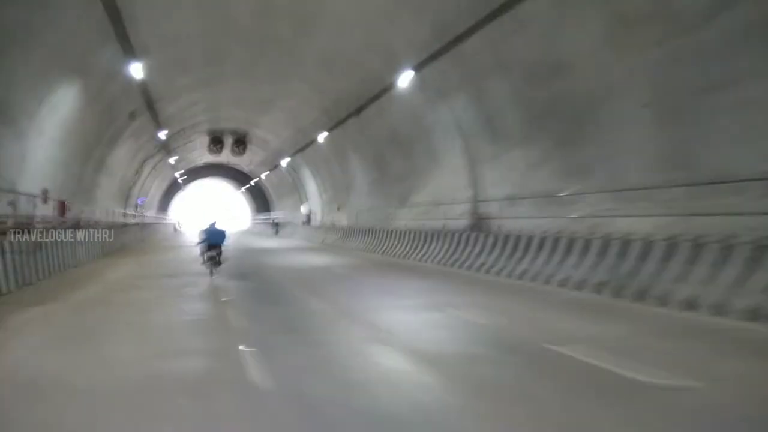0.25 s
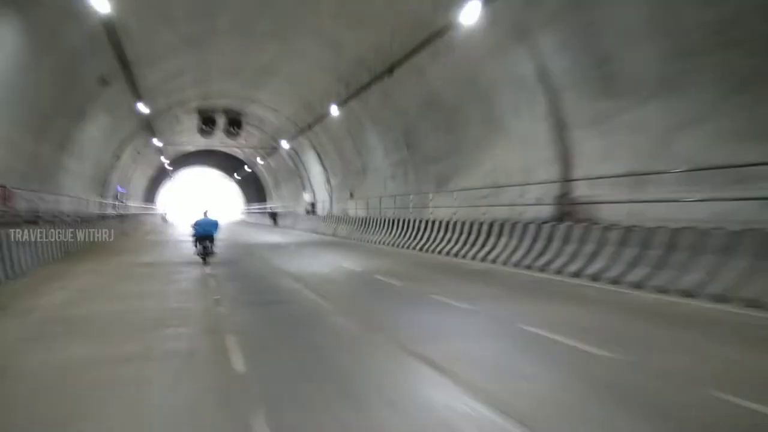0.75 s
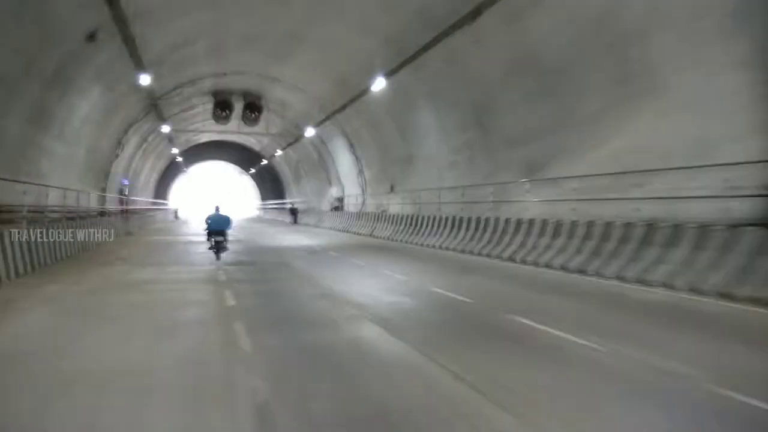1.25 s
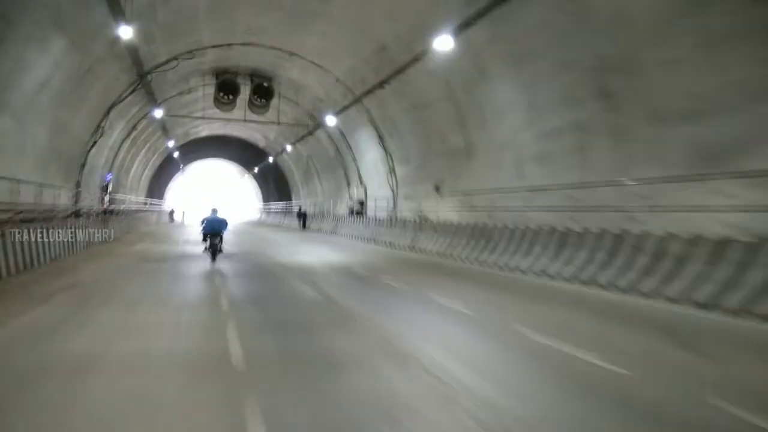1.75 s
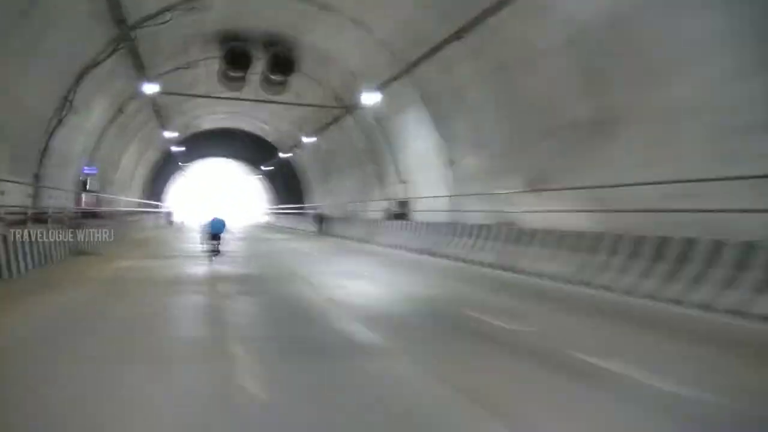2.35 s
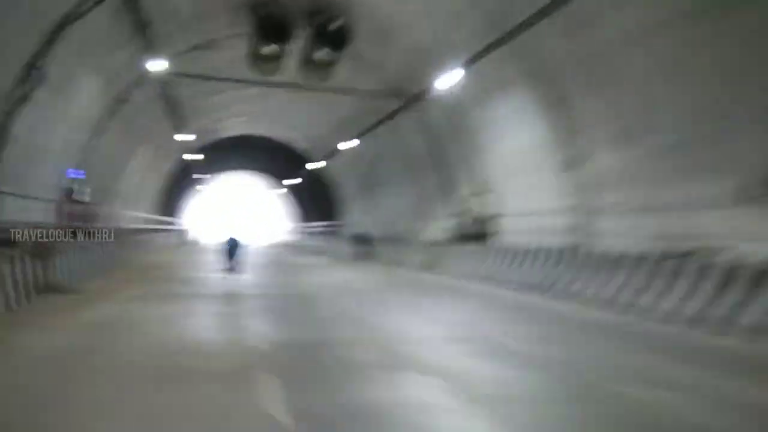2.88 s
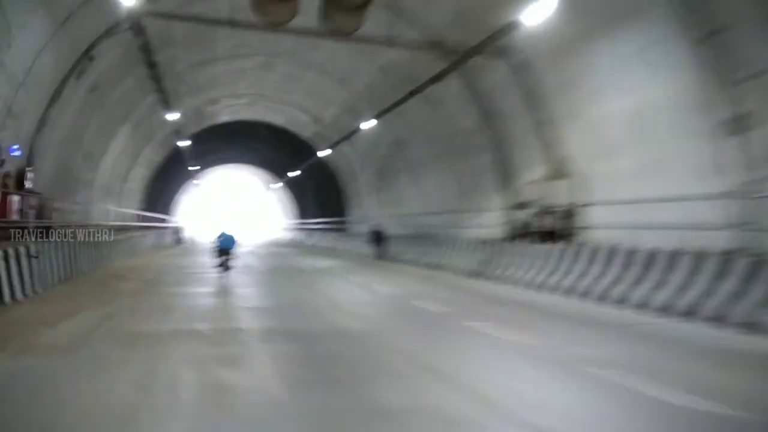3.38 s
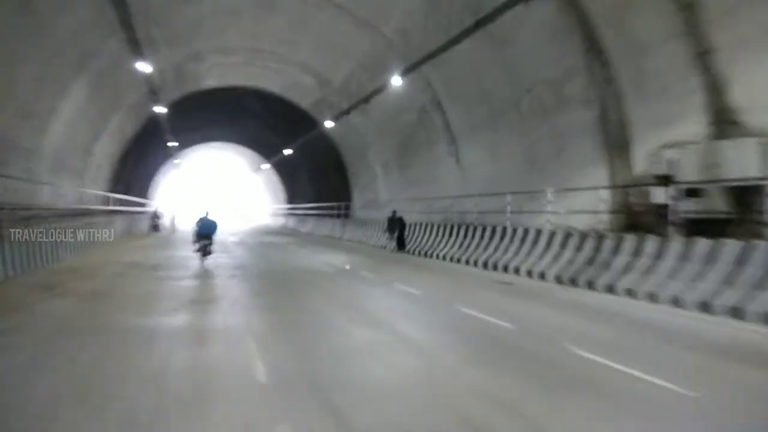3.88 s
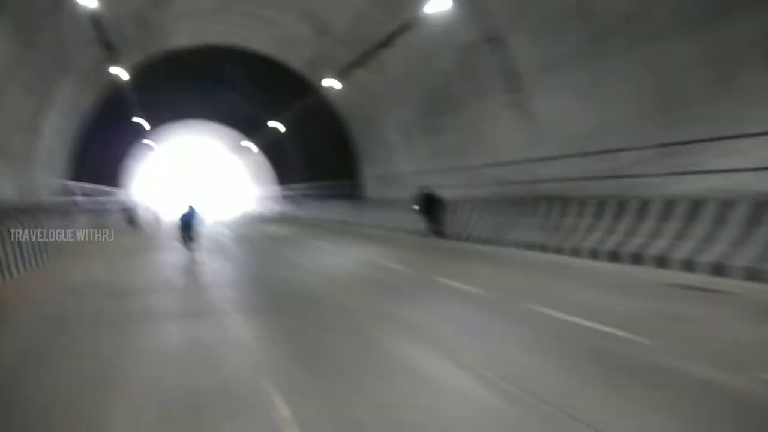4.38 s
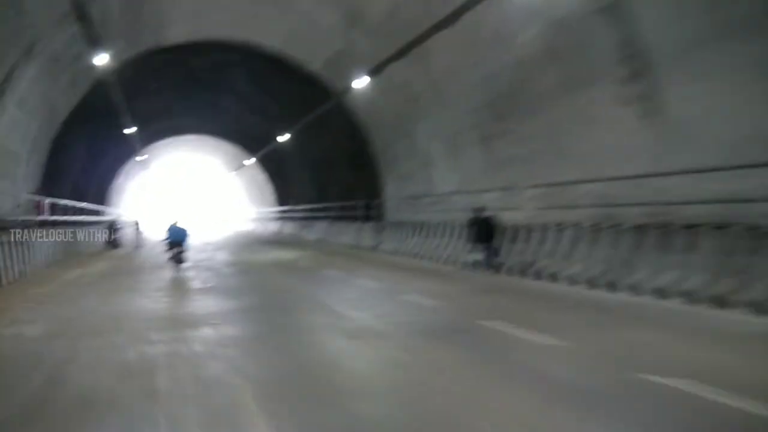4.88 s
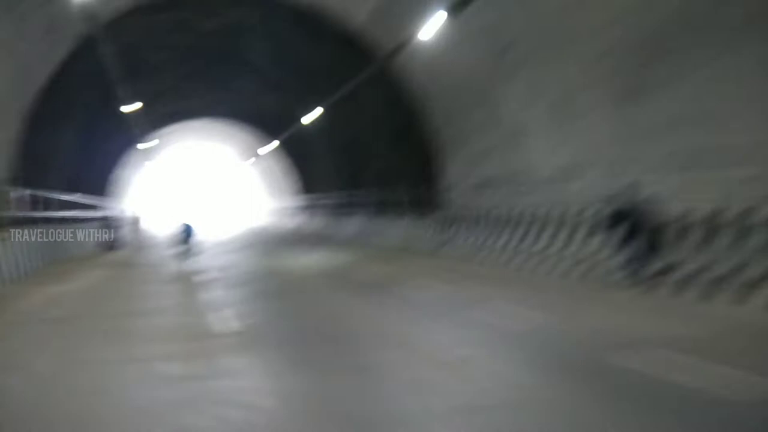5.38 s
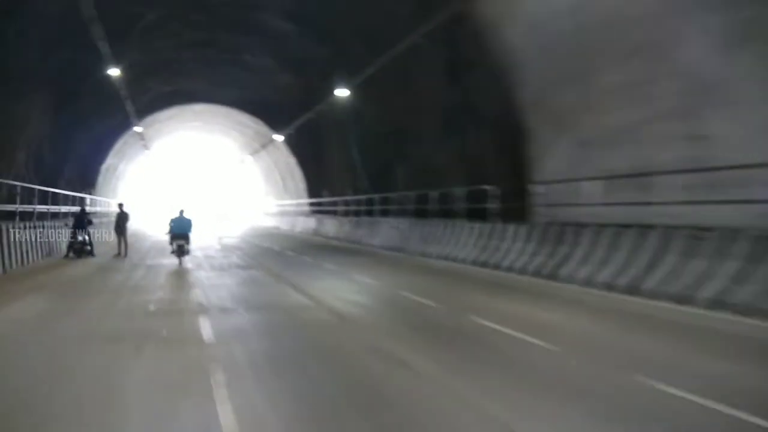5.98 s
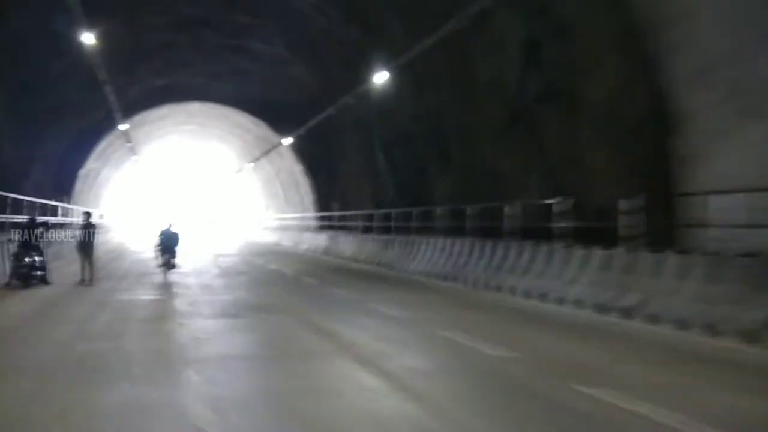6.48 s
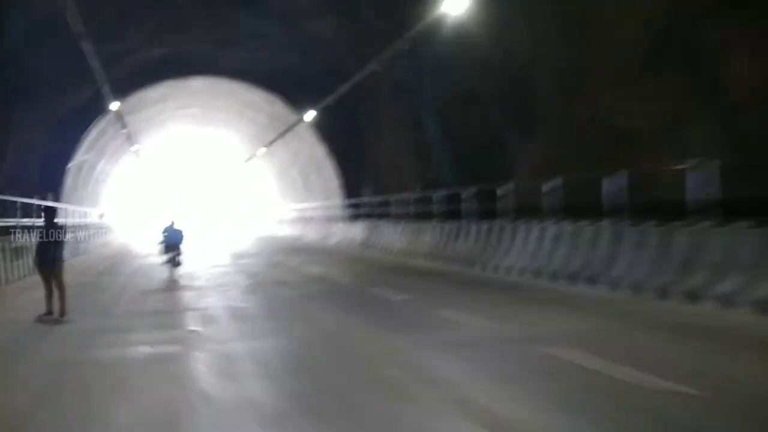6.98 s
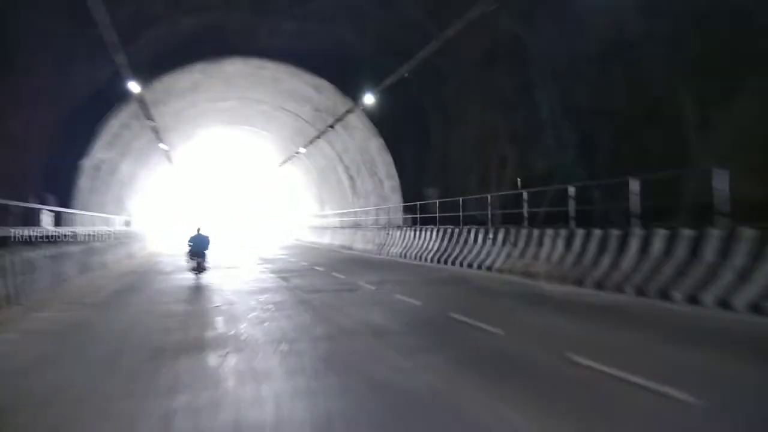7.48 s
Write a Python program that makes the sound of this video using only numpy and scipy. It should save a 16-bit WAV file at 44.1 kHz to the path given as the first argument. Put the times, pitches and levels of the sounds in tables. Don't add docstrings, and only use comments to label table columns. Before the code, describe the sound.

Motorbike ride through a road tunnel: heavy wind buffeting and snapping hard on the left, intermittent gusts on the right, faint engine drone and tyre hiss.

```python
import sys
import numpy as np
from scipy import signal
from scipy.fft import rfft, irfft
from scipy.io import wavfile
from scipy.ndimage import uniform_filter1d, minimum_filter1d, map_coordinates

SR = 44100
rng = np.random.default_rng(int(sys.argv[2]) if len(sys.argv) > 2 else 0)


def convert_level_to_amplitude(level_db):
    exponent = np.asarray(level_db, float) / 20
    return 10 ** exponent


def to_wav(s):
    ch = np.atleast_2d(s).T
    pcm = np.round(np.clip(ch, -1, 1) * 32767)
    wavfile.write(sys.argv[1], SR, pcm.astype(np.int16))


N = 341334

# frequency in Hz, density in dB per Hz.
TUNNEL_COLOUR = [(30, -7), (130, -9), (300, 3), (620, -20), (800, -34.5), (1400, -36.5), (2100, -18),
                 (2600, -16), (3200, -6)]
# time in seconds, cycles turned so far.
ENGINE_CYCLES = [(0, 0), (2.802, 40), (4.524, 65), (4.746, 68), (5.377, 77), (5.736, 82), (6.296, 90),
                 (7.783, 111)]
# time in seconds, level over the high hiss in dB.
TICK_LEVEL = [
    (0, -33),
    (2.6, -30),
    (3.6, -6),
    (4.5, -11),
    (5.4, -7),
    (6.0, -14),
    (7.74, -8.5),
]
# frequency in Hz, density in dB per Hz.
VALVE_COLOUR = [(6300, -24), (7100, -7.5), (7700, -1.5), (8500, -4.5), (9300, -13.5)]
# start in seconds, level in dB, decay in seconds.
WALL_PUFFS = [
    (1.064, -35.5, 0.13),
    (1.824, -34.5, 0.12),
]
# frequency in Hz, density in dB per Hz.
PUFF_COLOUR = [(3600, -26), (4200, 1.5), (6000, -2), (8300, -3.5), (9500, -13), (12000, -31)]
# frequency in Hz, density in dB per Hz.
LOW_HISS_COLOUR = [(1800, -22), (2500, -4), (3000, -3), (3180, -24), (3400, 2), (3830, -24), (4100, -0.5),
                   (4600, 3.5), (5500, -2), (6100, -5), (6900, -10.5), (8500, -75.5)]
RIGHT_HISS_COLOUR = [(6000, -15.5), (7400, 4), (9200, -2), (10200, 1), (11500, -4.5), (14000, -6.5),
                     (15700, -10)]
LEFT_HISS_COLOUR = [(5800, -8), (7800, -3), (9000, -6), (10200, 5.5), (11200, -3.5), (12100, 3),
                    (13200, -3), (14050, 4), (15000, -3), (15700, 0)]
# centre in seconds, half length in seconds, rise on the right in dB, on the left in dB.
HISS_SWELLS = [(0.6, 0.093, 6.5, 11.5), (0.8, 0.1, 4.5, 7.5), (1.16, 0.27, 11, 10.5),
               (1.56, 0.19, 8.5, 12.5), (1.9, 0.15, 10.5, 11), (2.2, 0.25, 6, 9), (2.44, 0.06, 3.5, 7.5),
               (2.86, 0.34, 8.5, 12.5), (3.38, 0.099, 8, 10), (3.52, 0.059, 6.5, 6), (3.76, 0.12, 9, 10),
               (3.9, 0.066, 6, 8.5), (3.98, 0.063, 5.5, 6.5), (4.07, 0.076, 11.5, 16.5),
               (4.24, 0.11, 8, 9.5), (4.44, 0.055, 4, 12), (4.58, 0.098, 7, 10), (4.96, 0.53, 3, 7),
               (5.11, 0.032, 2, 7.5), (5.48, 0.16, 5.5, 6.5), (5.74, 0.031, 0, 7.5), (5.96, 0.14, 5.5, 1.5),
               (6.36, 0.093, 6.5, 8), (6.56, 0.059, 9, 13.5), (6.74, 0.093, 12, 18), (7.0, 0.17, 8, 10.5),
               (7.44, 0.18, 7.5, 10.5), (7.72, 0.037, 4, 4.5)]
# time in seconds, low over high hiss in dB.
WALL_RETURN = [(0, 11), (1.3, 5.5), (2.3, -1.5), (3.998, -2), (5.5, -7), (6.15, 2.5), (6.4, -2), (7.74, -3)]
# centre in seconds, half length in seconds, rise of rumble in dB, of snaps in dB.
LEE_GUSTS = [(0.2, 0.21, 24, 14), (0.64, 0.027, 20, 11), (0.88, 0.052, 24, 12), (1.06, 0.063, 8, 12),
             (1.23, 0.1, 24, 19), (1.4, 0.15, 11.5, 2), (1.76, 0.11, 24.5, 9), (1.98, 0.18, 19, 10),
             (2.4, 0.32, 27.5, 23), (2.78, 0.088, 24.5, 19.5), (2.92, 0.061, 14, 15),
             (3.04, 0.1, 26.5, 14.5), (3.34, 0.33, 10, 7), (3.96, 0.33, 3, 8), (4.22, 0.086, 21, 17.5),
             (4.44, 0.064, 31, 19.5), (4.68, 0.17, 20.5, 5), (5.0, 0.15, 24, 15), (5.2, 0.09, -5, 7),
             (5.62, 0.043, 17, -5), (6.0, 0.044, 20, 5), (6.3, 0.049, 20.5, 12), (6.52, 0.1, 22, 14),
             (6.68, 0.09, 6, -3), (6.82, 0.087, 25.5, 20), (7.0, 0.15, 21.5, 3), (7.36, 0.055, 21, 5),
             (7.46, 0.063, 27, 28), (7.72, 0.081, 2, 15.5)]
# frequency in Hz, density in dB per Hz.
GUST_COLOUR = [(25, -12), (65, -23.5), (130, 3), (190, 2.5), (300, -1), (450, -12.5), (600, -23),
               (900, -45.5), (1500, -46)]
LEE_CAVITY_COLOUR = [(150, -39), (330, -4.5), (550, 4.5), (900, -11.5), (1200, -15.5), (1600, -11.5),
                     (2200, -21), (3200, -33.5)]
# start in seconds, level in dB, ring in Hz.
MOUNT_KNOCKS = [(2.317, -24, 840), (2.394, -36, 800), (2.425, -23, 750), (2.469, -21.5, 720),
                (2.5, -21, 710), (2.519, -31, 595), (2.769, -23, 880), (3.037, -28, 688), (3.086, -21, 710),
                (5.199, -17.5, 783), (7.42, -21, 685), (7.446, -23, 930), (7.461, -29, 936)]
# time in seconds, peak of the dull part in dB, bright part over
# the dull part in dB.
AIR_FLAPS = [(0.117, -36, -7), (0.246, -17, -2), (0.475, -37, 2), (0.641, -42, -8), (0.854, -38, -13),
             (1.055, -28, -22), (1.213, -25, -5), (1.38, -42, -12), (1.455, -38, -11), (1.605, -33, -3),
             (1.736, -24, -28.5), (1.787, -29, -5), (1.961, -33, 0), (2.023, -22, -20), (2.107, -25, 6),
             (2.188, -26, -21), (2.278, -11, -22), (2.623, -32, -6), (2.897, -25, 2), (3.198, -31, -0.5),
             (3.278, -41, -2), (3.36, -34, -16), (3.494, -34, 0), (3.56, -41, 0), (3.688, -40, 2),
             (3.869, -28, -6), (4.078, -37, -7), (4.132, -26, -4), (4.213, -20, -10), (4.441, -24, -9),
             (4.598, -44, -1), (4.762, -36, -2), (4.904, -33, -8), (4.95, -39, -14), (4.998, -22, -31),
             (5.045, -19, -5.5), (5.452, -45, -7), (5.637, -40, -1), (6.017, -45, -5), (6.268, -38, -11),
             (6.365, -45, 1), (6.484, -28, -25), (6.604, -41, -8), (6.815, -28, -15), (6.923, -32, -2),
             (7.009, -43, -3), (7.696, -33, -22)]
# frequency in Hz, density in dB per Hz.
FLAP_COLOUR = [(300, -6), (700, 0), (1000, -12), (1250, -40)]
FLAP_TOP_COLOUR = [(1100, -30), (1400, 0), (1800, -2), (2300, -25)]
# time in seconds, peak in dB.
STRAP_CRACKS = [(0.085, -19), (0.301, -20.5), (0.348, -13), (0.367, -14), (0.5524, -32), (0.764, -23.5),
                (0.976, -13), (1.3134, -49), (1.5799, -19.5), (1.661, -29), (3.1715, -26), (3.367, -23),
                (4.299, -23), (4.677, -33), (4.6927, -19), (4.7383, -19.5), (4.9452, -20), (5.1, -15.5),
                (5.1183, -23), (5.1324, -9.5), (5.423, -21.5), (5.7389, -29), (6.0167, -32), (7.135, -20),
                (7.1975, -41), (7.211, -19), (7.2906, -20), (7.585, -21.5)]
# frequency in Hz, density in dB per Hz.
CRACK_COLOUR = [(800, -33), (1300, 3.5), (2000, -3.5), (2600, 5), (3200, -8.5), (4400, -19), (5000, -30.5),
                (7000, -45.5)]
# centre in seconds, half length in seconds, rise of snaps in dB, of edge in dB.
WIND_FLURRIES = [(0.1, 0.11, 13.5, 13), (0.34, 0.088, 8.5, 16), (0.6, 0.23, 10, 13.5),
                 (1.06, 0.22, 8.5, 13.5), (1.4, 0.094, 11.5, 10.5), (1.56, 0.2, 5, 10), (1.8, 0.09, 7, 1.5),
                 (1.96, 0.12, -1.5, 8), (2.24, 0.3, 6, 5), (2.52, 0.075, 5.5, 0.5), (2.82, 0.029, 8, 11),
                 (3.2, 0.097, 3.5, 13.5), (3.4, 0.18, 2.5, 5.5), (3.7, 0.51, 6.5, 2.5),
                 (3.86, 0.035, 1, 10), (4.3, 0.092, 9, 13), (4.66, 0.054, 8.5, 13.5), (4.84, 0.16, 5, 8),
                 (5.08, 0.15, 5.5, 11.5), (5.42, 0.058, 11, 14.5), (5.62, 0.043, 12.5, 14.5),
                 (5.78, 0.23, 6, 11), (6.0, 0.065, 8, 10.5), (6.18, 0.1, 12, 14.5), (6.74, 0.1, 6.5, 8.5),
                 (7.1, 0.5, 4, 6.5), (7.12, 0.17, 4, 7), (7.58, 0.034, 10, 14.5)]
# centre in seconds, half length in seconds,
# rise of its body in dB, rise of its deepest part in dB.
RIDER_LEANS = [(0.29, 0.11, 3, 2.5), (0.58, 0.023, 0, -9), (0.67, 0.022, -1, 9), (1.2, .04, -3.5, -5.5),
               (1.46, 0.08, 1, -6.5), (2.26, 0.024, -2, -8), (2.49, 0.03, 2.5, -2.5), (2.77, 0.044, -1, -2),
               (2.89, .04, -3, -1), (3.51, 0.035, -2.5, -1), (3.87, 0.065, 1.5, -0.5), (4.32, 0.044, 3, 0),
               (4.45, .04, -5, 7), (5.79, 0.059, 7, -4), (6.08, 0.091, 0.5, -5), (6.35, 0.022, -3.5, 5),
               (6.41, .04, -1, 8), (7.05, 0.091, 3, -12), (7.25, 0.049, -0.5, -22), (7.4, .04, -2.5, 2)]
# time in seconds, peak in dB, edge over cavity in dB.
STRONG_SNAPS = [(0.118, -23, -14), (0.282, -14.5, -14), (0.505, -19, -20), (0.526, -9, -3),
                (0.569, -15, -13), (0.741, -23, -2.5), (0.764, -17.5, -10), (1.312, -18, -29),
                (1.391, -7, -9), (1.547, -26.5, -5.5), (1.579, -19.5, -5), (1.662, -15.5, -23),
                (1.908, -19.5, -4), (2.021, -21.5, -4), (2.391, -16, -13), (2.565, -20, -28),
                (2.682, -21.5, -27), (2.806, -7, -21), (3.144, -21.5, -5.5), (3.191, -16, -19.5),
                (3.228, -13, -29), (3.279, -16, -14), (3.339, -20, -24), (3.366, -15, -13),
                (3.443, -25, -21), (3.454, -16, -18), (3.469, -12.5, -17), (3.507, -14, -28),
                (3.677, -25, -25), (3.721, -31, -21), (3.81, -16, -28), (3.921, -16.5, -33),
                (4.029, -23, -14), (4.128, -17, -21), (4.207, -13.5, -24), (4.344, -20, -11.5),
                (4.579, -31, 4.5), (4.618, -21.5, -9.5), (4.676, -10.5, -18), (4.774, -19.5, -15),
                (4.935, -17.5, -10.5), (5.009, -18.5, -6.5), (5.131, -14, -18), (5.397, -17, -12.5),
                (5.628, -12, -23), (5.737, -17.5, -6), (5.936, -16, -9), (5.99, -13, -15),
                (6.087, -21, -15), (6.203, -19, -13), (6.299, -16, -16.5), (6.653, -14, -12.5),
                (6.696, -23, -16), (6.821, -13, -14), (7.015, -21, -11.5), (7.064, -19, -19),
                (7.106, -12, -5.5), (7.343, -20.5, -11.5), (7.501, -31, -20), (7.545, -24, -21)]
# time in seconds, peak in dB.
EDGE_TEARS = [(0.0478, -30.5), (0.0975, -23.5), (0.14, -23.5), (0.157, -19), (0.1787, -42), (0.2434, -26.5),
              (0.314, -20.5), (0.327, -20.5), (0.3549, -12.5), (0.407, -21.5), (0.45, -21.5), (0.5131, -26),
              (0.5401, -21), (0.5498, -19.5), (0.7096, -22), (0.842, -27), (0.925, -24), (0.95, -34),
              (1.0237, -34), (1.3518, -26), (1.4302, -19), (2.207, -27), (3.108, -29), (3.189, -33),
              (3.204, -37), (3.236, -21.5), (3.258, -28), (3.3555, -26.5), (3.3978, -27), (3.461, -29.5),
              (3.5607, -26), (4.8626, -31.5), (4.9082, -31.5), (5.4079, -24), (5.464, -28), (5.6022, -23),
              (5.6406, -35), (5.7122, -20.5), (5.8075, -33), (5.825, -28), (5.848, -20.5), (5.8587, -26),
              (5.8714, -30), (5.9115, -25.5), (5.965, -25), (6.0119, -21), (6.052, -30), (6.125, -30),
              (6.1474, -25), (6.1712, -23), (6.1944, -22), (6.2068, -26), (6.221, -30), (6.2776, -32.5),
              (7.031, -25), (7.043, -28), (7.362, -23), (7.5652, -31)]
# frequency in Hz, density in dB per Hz.
BUFFET_COLOUR = [(30, -26), (60, -24), (95, -13.5), (140, 0), (200, -0.5), (350, -4.5), (520, -8),
                 (600, -17), (690, -42), (900, -58)]
CAVITY_COLOUR = [(550, -26.5), (740, -7), (880, 8), (980, 10.5), (1220, 6.5), (1340, -7.5), (1750, -36)]
THUMP_COLOUR = [(150, -28.5), (300, 0.5), (500, 3.5), (640, -7), (800, -17), (1100, -42)]
EDGE_COLOUR = [(1150, -13), (1450, 2), (1850, -3.5), (2050, -8), (2350, -4.5), (2950, -7), (3150, -25),
               (4300, -19.5), (5500, -34.5)]

FIRING_HZ, ENGINE_DB, TUNNEL_DB = 128, -50, -51
TICK_DECAY_CYCLES, PUFF_RISE_S = 0.07, 0.0065
CALM_LOW_DB, CALM_RIGHT_DB, CALM_LEFT_DB = -53.5, -51.5, -52
CALM_GUST_DB, CALM_LEE_SNAP_DB = -42, -55
BUFFET_DB, CALM_SNAP_DB, CALM_EDGE_DB = -12, -26.5, -39
DEEP_HZ, LULL_S, LULL_DB = 165, 0.007, -8


def level(x, db):
    return convert_level_to_amplitude(db) * x / np.sqrt(np.mean(x ** 2))


def colour(x, points):
    size = 4096
    hz, db = np.transpose(points)
    log_hz = np.log(np.maximum(np.arange(size // 2 + 1) * SR / size, 10))
    cepstrum = irfft(np.log(convert_level_to_amplitude(np.interp(log_hz, np.log(hz), db, right=-70))))
    cepstrum[1:size // 2] *= 2
    cepstrum[size // 2 + 1:] = 0
    response = irfft(np.exp(rfft(cepstrum)))
    return signal.oaconvolve(np.r_[x[-size:], x], response)[size:size + N]


def walk(rate):
    hold = int(SR / rate)
    held = np.repeat(rng.standard_normal(N // 100), hold)[:N]
    slewed = uniform_filter1d(uniform_filter1d(held, hold), hold // 2 + 1)
    return slewed / slewed.std()


def eddies(rate, spread_db):
    when, size, sign = rng.random((3, N))
    strength = convert_level_to_amplitude(spread_db * np.minimum(-np.log(1 - size), 3.6))
    return (when < rate / SR) * strength * np.sign(sign - 0.5)


def patchy(x, width_hz, hold_s, patchy_db):
    f, t, z = signal.stft(x, SR, nperseg=512)
    chance = rng.standard_normal((128, 1024))
    places = np.meshgrid(f / max(width_hz, 200), t / max(hold_s, 0.01), indexing="ij")
    db = map_coordinates(chance, places, order=1)
    return signal.istft(z * convert_level_to_amplitude(patchy_db * db), SR, nperseg=512)[1][:N]


def even(x, span_s):
    return x / np.sqrt(uniform_filter1d(x ** 2, int(span_s * SR)) + 0.0023 * np.mean(x ** 2))


def swells(table):
    s, half_s, *rise_db = np.transpose(table)
    t = np.arange(0, N + 64, 64) / SR
    bells = np.exp(-((t[:, None] - s) / np.maximum(half_s, 0.02)) ** 2)
    return [np.interp(np.arange(N) / SR, t, bells @ db) for db in rise_db]


def volley(s, db, span_s):
    delay = rng.random((len(s), 8)) - 0.1
    size = rng.uniform(-1, 1, (len(s), 8))
    delay[:, 0] = 0
    size[:, 0] = np.sign(size[:, 0])
    size = convert_level_to_amplitude(db)[:, None] * size * np.exp(-1.2 * np.abs(delay))
    index = ((s[:, None] + delay * span_s) * SR).astype(int)
    return np.bincount(index.ravel(), size.ravel(), N)[:N]


def tunnel_roar():
    return np.array([level(patchy(colour(rng.standard_normal(N), TUNNEL_COLOUR), 240, 0.022, 3.5), TUNNEL_DB)
                     for _ in range(2)])


def engine():
    phase = 2 * np.pi * np.cumsum(FIRING_HZ * (1 + 0.0298 * walk(2.3))) / SR
    return level(np.sin(phase) * convert_level_to_amplitude(4.1 * walk(8.8)), ENGINE_DB)


def valve():
    t = np.arange(N) / SR
    turned = np.interp(t, *np.transpose(ENGINE_CYCLES))
    size_db = 1.0 * rng.standard_normal(128)[turned.astype(int)]
    decay = np.exp(-(turned % 1) / TICK_DECAY_CYCLES)
    ticks = colour(rng.standard_normal(N) * decay, VALVE_COLOUR)
    return level(ticks, np.interp(t, *np.transpose(TICK_LEVEL)) + size_db)


def puffs():
    s, db, decay_s = np.transpose(WALL_PUFFS)
    age = np.maximum(np.arange(N)[:, None] / SR - s, 0)
    shape = (1 - np.exp(-age / PUFF_RISE_S)) * np.exp(-age / decay_s) @ convert_level_to_amplitude(db)
    return shape * level(colour(rng.standard_normal(N), PUFF_COLOUR), 0)


def hiss():
    right_db, left_db = swells(HISS_SWELLS)
    walls_db = np.interp(np.arange(N) / SR, *np.transpose(WALL_RETURN))
    low_db = CALM_LOW_DB + 1.06 * right_db + 0.5 * walls_db
    right_db = CALM_RIGHT_DB + right_db - 0.2 * walls_db
    left_db = CALM_LEFT_DB + left_db
    flicker = convert_level_to_amplitude(1.4 * walk(90))
    air = [even(patchy(flicker * rng.standard_normal(N), 700, 0.035, 2.8), 0.099) for _ in range(2)]
    left = level(colour(air[0], LOW_HISS_COLOUR), low_db - 5.0)
    left = left + level(colour(air[0], LEFT_HISS_COLOUR), left_db)
    right = level(colour(air[1], LOW_HISS_COLOUR), low_db)
    right = right + level(colour(air[1], RIGHT_HISS_COLOUR), right_db)
    tick, puff = valve(), puffs()
    return np.array([left + convert_level_to_amplitude(left_db) * tick + convert_level_to_amplitude(-2.5) * puff,
                     right + convert_level_to_amplitude(right_db - 9.0) * tick + puff])


def lee_gusts():
    rise_db, sharp_db = swells(LEE_GUSTS)
    gust_db = CALM_GUST_DB + 0.97 * rise_db
    snap_db = CALM_LEE_SNAP_DB + 1.546 * sharp_db
    lumps = 4.43 * walk(30)
    gust = colour(eddies(2000, 0.17) * convert_level_to_amplitude(lumps), GUST_COLOUR)
    snaps = colour(eddies(550, 2.4) * convert_level_to_amplitude(1.4 * lumps + 4.6 * walk(45)), LEE_CAVITY_COLOUR)
    snaps = even(patchy(snaps, 300, 0.022, 6.5), 0.07)
    return level(even(gust, 0.13), gust_db) + level(snaps, snap_db - 7)


def mount_knocks():
    out = np.zeros(N)
    t = np.arange(600) / SR
    envelope = np.exp(-t / 0.0021) * (1 - np.exp(-t / 0.0011))
    for s, db, ring_hz in MOUNT_KNOCKS:
        ring = np.sin(2 * np.pi * ring_hz * t) + 1.63 * np.sin(2 * np.pi * 2.01 * ring_hz * t)
        delay = rng.integers(0, 900, 5) * [0, 1, 1, 1, 1]
        strength = rng.uniform(-1, 1, 5) * 1.2 + [1, 0, 0, 0, 0]
        chatter = np.bincount(delay, strength, 900)
        knock = convert_level_to_amplitude(db + 6.0) * np.convolve(chatter, ring * envelope)
        i = int(s * SR)
        out[i:i + len(knock)] += knock[:N - i]
    return out


def flaps():
    s, db, top_db = np.transpose(AIR_FLAPS)
    click = np.arange(N) == 0
    out = np.zeros(N)
    for part_db, points in [(db, FLAP_COLOUR), (db + top_db, FLAP_TOP_COLOUR)]:
        burst = volley(s - 0.004, part_db - 1.5, 0.03) + volley(s + 0.006, part_db - 4.0, 0.03)
        out += colour(burst, points) / np.abs(colour(click, points)).max()
    return out


def cracks():
    s, db = np.transpose(STRAP_CRACKS)
    return convert_level_to_amplitude(21.5) * colour(volley(s, db, 0.003), CRACK_COLOUR)


def buffeting(rise_db, shake):
    body_db, deep_db = swells(RIDER_LEANS)
    buffet = colour(eddies(2500, 2.15) * convert_level_to_amplitude(2.2 * shake + 1.0 * walk(7.9)), BUFFET_COLOUR)
    buffet = even(buffet, 0.1)
    deep = signal.sosfiltfilt(signal.butter(2, DEEP_HZ, fs=SR, output="sos"), buffet)
    buffet = buffet + (convert_level_to_amplitude(deep_db - body_db) - 1) * deep
    return level(buffet, BUFFET_DB + 0.17 * rise_db + body_db)


def flurries(rise_db, sharp_db, shake):
    flurry = 2.4 * shake + 1.6 * walk(22) + 3.2 * walk(140)
    kicks = eddies(480, 2.1) * convert_level_to_amplitude(flurry)
    tears = 1.1 * kicks + 0.6 * eddies(520, 2.4) * convert_level_to_amplitude(flurry)
    cavity = even(patchy(colour(kicks, CAVITY_COLOUR), 321, 0.026, 2.8), 0.097)
    edge = even(patchy(colour(tears, EDGE_COLOUR), 600, 0.02, 4.5), 0.06)
    return level(cavity, CALM_SNAP_DB + rise_db - 6.0) + level(edge, CALM_EDGE_DB + sharp_db - 5.0)


def strong_snaps():
    s, db, bright_db = np.transpose(STRONG_SNAPS)
    big = volley(s, np.minimum(db, -11), 0.016)
    bright = big * convert_level_to_amplitude(np.interp(np.arange(N) / SR - 0.003, s, bright_db))
    tear_s, tear_db = np.transpose(EDGE_TEARS)
    torn = volley(tear_s, tear_db, 0.009)
    cavity = convert_level_to_amplitude(28.5) * colour(big + 1.4 * torn, CAVITY_COLOUR)
    thump = convert_level_to_amplitude(38.0) * colour(big, THUMP_COLOUR)
    edge = patchy(colour(convert_level_to_amplitude(35.0) * bright + convert_level_to_amplitude(32.5) * torn, EDGE_COLOUR), 450, 0.012, 5.0)
    return cavity + thump + edge


def lulls():
    s = np.r_[np.transpose(STRONG_SNAPS)[0], np.transpose(EDGE_TEARS)[0]]
    before = np.bincount(((s - LULL_S / 2) * SR).astype(int), minlength=N)[:N]
    dip = signal.oaconvolve(before, np.hanning(int(2 * LULL_S * SR)), "same")
    return LULL_DB * np.minimum(dip, 1)


def windward():
    rise_db, sharp_db = swells(WIND_FLURRIES)
    shake = walk(40)
    lull_db = lulls()
    buffet = buffeting(rise_db, shake) * convert_level_to_amplitude(0.52 * lull_db)
    return buffet + flurries(rise_db, sharp_db, shake) * convert_level_to_amplitude(lull_db) + strong_snaps()


def scene():
    left = windward() + cracks()
    right = lee_gusts() + mount_knocks() + flaps()
    return tunnel_roar() + engine() + hiss() + np.array([left, right])


def top_cut(x):
    return signal.sosfilt(signal.butter(12, 16060, fs=SR, output="sos"), x)


def record(dry):
    dry = signal.sosfilt(signal.butter(2, 27, "highpass", fs=SR, output="sos"), dry)
    top = 0.77
    peak = -minimum_filter1d(-np.abs(dry), size=301)
    held = minimum_filter1d(top / np.maximum(peak, top), size=101)
    gain = uniform_filter1d(held, size=301) ** 0.9
    return top_cut(dry * gain)


dry = scene()
out = record(dry)
to_wav(out)
```